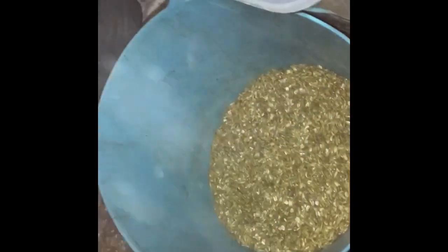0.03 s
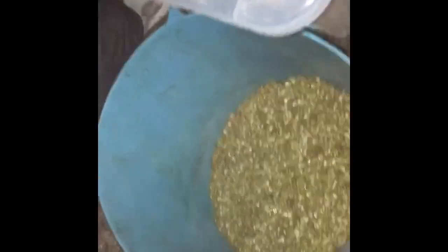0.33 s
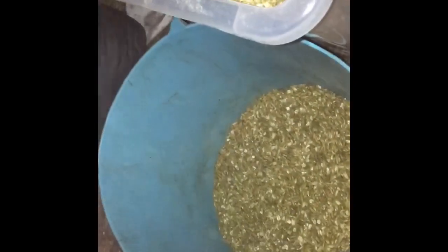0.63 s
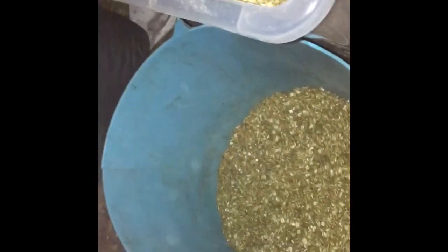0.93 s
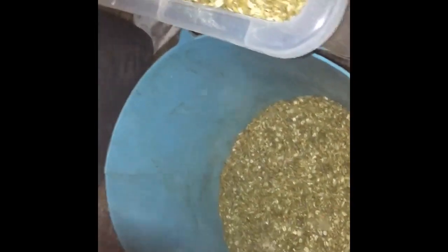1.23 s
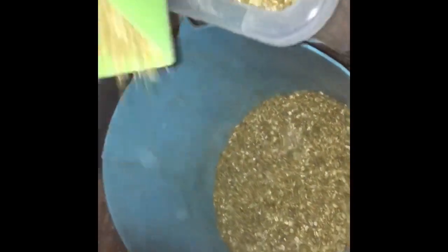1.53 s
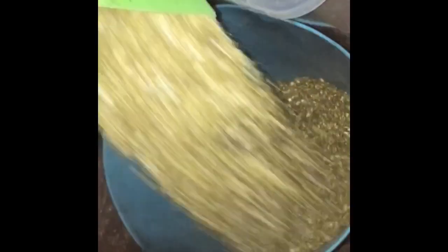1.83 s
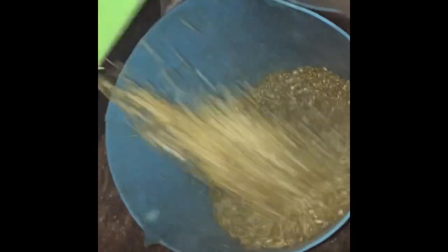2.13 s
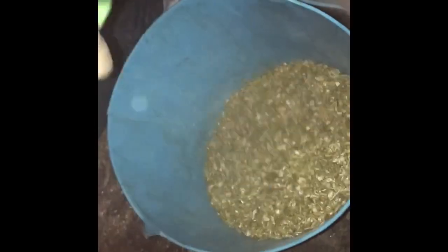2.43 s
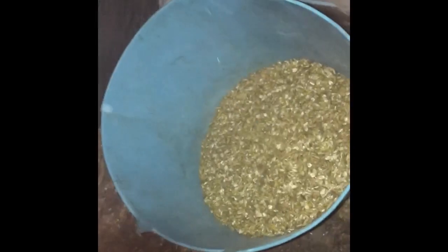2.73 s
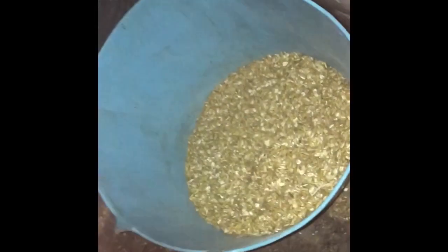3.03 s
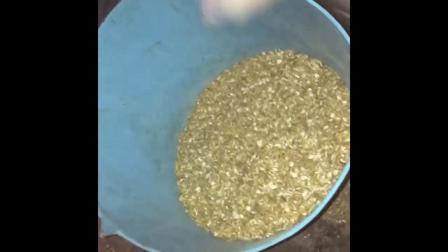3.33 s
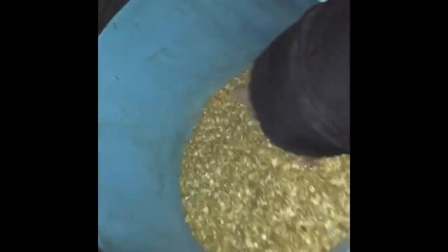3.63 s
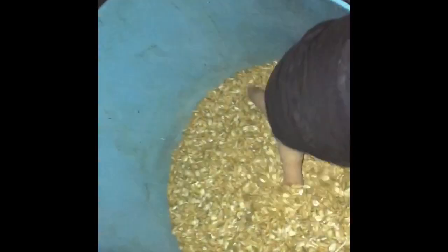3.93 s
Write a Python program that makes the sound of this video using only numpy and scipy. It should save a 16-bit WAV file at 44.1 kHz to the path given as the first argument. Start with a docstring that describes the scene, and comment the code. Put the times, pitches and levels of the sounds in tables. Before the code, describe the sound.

Close up, dry flakes hiss and crunch under a scoop, then rush into a plastic bucket, the scoop knocking as the pour starts and ends. A sleeve swishes past, and hand stirring follows with scraping and dull bumps.

```python
"""Close to one microphone, dry feed is scooped from a tub: countless colliding flakes make
a fine hiss and a coarser crunch. Next the feed is poured into a plastic bucket, and the scoop
knocks as the pour starts and ends. Then comes a quick swish as an arm brushes past.
Last, a hand stirs the feed, scraping along the wall, and the bucket is bumped."""
import sys
import numpy as np
from scipy import signal
from scipy.fft import rfft, irfft, next_fast_len
from scipy.io import wavfile
from scipy.ndimage import map_coordinates

SR = 44100
rng = np.random.default_rng(int(sys.argv[2]) if len(sys.argv) > 2 else 0)


def wav_record(signal):
    """Record a signal, one row per channel, as 16-bit PCM in the file named by sys.argv[1]."""
    frames = np.transpose(np.atleast_2d(signal))
    bounded = np.clip(frames, -1, 1)
    # unit amplitude maps onto the largest positive 16-bit level
    quanta = np.round(bounded * 32767).astype(np.int16)
    wavfile.write(sys.argv[1], SR, quanta)


N = 176400
TIME_S = np.arange(N) / SR
FLAKES_PER_S, CRUNCHES_PER_S, USUAL_FLOW_DB = 11000, 2400, -48  # hits a second at the usual flow
SURGE_DB = 1.13  # the level wavers because the feed slides unevenly


def amp(db):
    """Turn decibels into a number to multiply by."""
    return 10 ** (np.asarray(db) / 20)


def unit(x):
    """Scale a sound to an average (rms) level of 1."""
    return x / np.sqrt(np.mean(x ** 2) + 1e-20)


def curves(rows):
    """Join timed rows with straight lines: one curve for each column after the time."""
    times, *columns = np.transpose(rows)
    return [np.interp(TIME_S, times, column) for column in columns]


def wobble(per_s):
    """A smooth curve through per_s random values a second."""
    values = rng.standard_normal(int(N * per_s / SR) + 4)
    return map_coordinates(values, [TIME_S * per_s])


def filtered(x, gain_at):
    """Turn each frequency up or down by gain_at(hz)."""
    size = next_fast_len(N + 8192)
    return irfft(rfft(x, size) * gain_at(np.fft.rfftfreq(size, 1 / SR)), size)[..., :N]


def coloured(x, colour, tilt_db=0):
    """Give a sound a colour (its mix of low and high) and a tilt per octave, at level 1."""
    points_hz, points_db = np.transpose(colour)

    def gain_at(hz):
        level_db = np.interp(np.log(hz + 1), np.log(points_hz), points_db)
        return amp(level_db + tilt_db * np.log2(hz / points_hz[-1] + 0.0038))
    return unit(filtered(x, gain_at))


def fade(t, fade_s):
    """Die away by 60 dB every fade_s seconds."""
    return np.exp(-np.log(1000) * t / fade_s)


def tone(t, hz, fade_s):
    """A ringing note that starts quickly and dies away."""
    return fade(t, fade_s) * np.sin(2 * np.pi * hz * t) * (1 - np.exp(-t * hz))


def swell(middle_s, length_s):
    """A rounded rise and fall around a moment."""
    return np.exp(-np.abs(2 * (TIME_S - middle_s) / length_s) ** 3 / 2)


def swells(moves, colour):
    """Noise that rises and falls with each movement."""
    loudness = sum(amp(db) * swell(middle_s, length_s) for middle_s, length_s, db in moves)
    return loudness * coloured(rng.standard_normal(N), colour)


def add(track, start_s, sound):
    """Mix a sound into a track at a given time."""
    part = track[round(start_s * SR):][:len(sound)]
    part += sound[:len(part)]


def background():
    """A quiet, low noise whose level wavers a little."""
    # frequency_hz, level_db
    colour = [(20,-20),(55,-2.5),(235,-13),(287,-1.5),(340,-12.5),(1200,-22.5),(15500,-37)]
    level_db = -59 + 1.5 * wobble(per_s=10)
    return amp(level_db) * coloured(rng.standard_normal(N), colour)


def room(sound):
    """The walls send back a short, soft wash of echoes."""
    t = np.arange(SR // 2) / SR
    echoes = rng.standard_normal(len(t)) * fade(t, fade_s=0.22) * (t > .003)
    return amp(-10.5) * signal.fftconvolve(sound, echoes / np.linalg.norm(echoes))[:N]


def bumps():
    """Soft, deep bumps."""
    # middle_s, length_s, level_db
    moves = [(.26,0.074,-55),(.32,0.043,-51),(.45,0.13,-53.5),(.945,.025,-56),(1.265,0.039,-53),(3.81,0.17,-52)]
    # frequency_hz, level_db
    colour = [(25,-21),(55,4),(100,-1),(200,-16),(600,-55)]
    return swells(moves, colour)


def bucket_shifts():
    """The bucket bends and shifts with a dull noise."""
    # middle_s, length_s, level_db
    moves = [(2.945,0.08,-46.5),(3.12,0.21,-54),(3.39,0.1,-45.5),(3.66,0.085,-55),(3.88,0.16,-54)]
    # frequency_hz, level_db
    colour = [(40,-12),(130,-1),(220,3),(370,0),(480,-11),(700,-9),(1500,-32)]
    return swells(moves, colour)


def brush():
    """A swish, likely a sleeve on the rim: its highest part starts at once and dies first."""
    # cloth on plastic: frequency_hz, level_db
    colour = [(150,-9),(320,9),(900,-4),(3000,4),(7000,0),(15500,-3)]
    start_s, rise_s, split_hz = 3.03, 0.021, 8700
    t = TIME_S - start_s
    noise = coloured(rng.standard_normal(N), colour)
    low = filtered(noise, lambda hz: 1 / (1 + (hz / split_hz) ** 4))
    rise = np.clip(t / rise_s, 0, 1)
    after_s = np.maximum(t - rise_s, 0)
    body = low * np.sqrt(rise) * fade(after_s, fade_s=0.14)
    top = (noise - low) * rise ** 0.19 * fade(after_s, fade_s=0.1)
    return amp(-34) * (body + top)


def scrape(stroke, width_hz=340):
    """Rubbing makes a band of noise around a pitch that slides as the stroke goes on."""
    level_db, pitch_hz = curves(stroke)
    slips = filtered(rng.standard_normal((2, N)), lambda hz: 1 / (1 + (hz / width_hz) ** 2))
    phase = 2 * np.pi * np.cumsum(pitch_hz) / SR
    rubbing = unit(slips[0] * np.cos(phase) + slips[1] * np.sin(phase))  # moved up to the pitch
    touching = (TIME_S > stroke[0][0]) & (TIME_S < stroke[-1][0])
    return amp(level_db) * rubbing * touching


def scrapes():
    """The scoop digs into the tub; later the hand slides along the bucket wall."""
    # time_s, level_db, pitch_hz
    scoop_stroke = [(.62,-65,1898),(.68,-47,1724),(.77,-78,1510)]
    # time_s, level_db, pitch_hz
    hand_stroke = [(3.35,-51,890),(3.52,-66,1709),(3.6,-44.5,1640),(3.675,-43,1400),(3.72,-47,1054),(3.75,-59,1061),(3.86,-53.5,1493),(3.92,-62.5,1388),(3.99,-54,1300)]
    return scrape(scoop_stroke) + scrape(hand_stroke)


def snaps():
    """Flakes and plastic snap: each sharp tick has a faint, short tail."""
    # start_s, level_db, brightness_hz
    ticks = [(.8066,-30.5,3000),(.893,-37,2200),(1.257,-49,6000),(1.061,-35.5,9800),(1.238,-49,3600),(1.772,-34,6000),(2.985,-39,6500),(3.002,-43,2500),(3.072,-37,5500),(3.1348,-40,4480),(3.164,-23,3100)]
    out, t = np.zeros(N), np.arange(SR // 4) / SR
    loudness = fade(t, fade_s=0.0065) + amp(-15) * fade(t, fade_s=0.06)
    for start_s, level_db, hz in ticks:
        band = signal.butter(1, [hz * .75, min(hz * 1.35, SR / 2.2)], 'band', fs=SR)
        noise = signal.lfilter(*band, rng.standard_normal(len(t)))
        add(out, start_s, amp(level_db) * unit(noise) * loudness)
    return out


def knocks():
    """Each blow dents one spot of the wall and rings the bucket; soft contacts are duller."""
    # start_s, level_db, brightness_hz, spot_pitch_hz, spot_boost_db, spot_fade_s
    blows = [(1.152,-60,200,146,20.5,0.057),(1.6553,-31,9000,1165,5,.028),(1.6592,-34,550,278,11,.06),(2.2674,-36,1500,410,8,0.044),(2.27,-37,303,147,11.5,.11),(2.279,-31.5,302,270,5.5,0.13),(3.087,-49.5,450,534,11,0.083),(3.354,-46,600,360,18,.045),(3.699,-41,1500,1110,21,0.017),(3.785,-34.5,706,241,12,0.045),(3.794,-36,398,370,13,0.063),(3.806,-43.5,298,287,14.5,0.079),(3.821,-43,250,136,13,.13)]
    # the notes the bucket rings with: pitch_hz, level_db, fade_s
    bucket_notes = [(130,-12,0.16),(148.3,-23,0.77),(150,-9,0.092),(207,-7.5,0.17),(288,-21,0.71),(289,0,0.06),(369,-4.5,0.14),(455,-13.5,0.15),(512,-9,0.08),(834,-10,0.096),(1050,-15,0.05),(1410,-6.5,0.063),(2130,-10,0.051),(2370,1,.032)]
    # the burst of noise in each blow: frequency_hz, level_db
    crack_colour = [(50,-8),(200,8.5),(650,2.5),(1000,1),(2700,-2.5),(4000,-11.5),(9000,-14)]
    out, t = np.zeros(N), np.arange(SR // 2) / SR
    for start_s, level_db, brightness_hz, spot_hz, spot_db, spot_fade_s in blows:
        ring = sum((-1) ** k * amp(db + rng.normal(0, 1)) * tone(t, hz, fade_s)
                   for k, (hz, db, fade_s) in enumerate(bucket_notes))
        noise = coloured(rng.standard_normal(N), crack_colour)[:len(t)]
        crack = amp(8) * fade(t, fade_s=0.042) * noise
        softened = signal.lfilter(*signal.butter(2, brightness_hz, fs=SR), ring + crack)
        dent = amp(spot_db) * tone(t, spot_hz, spot_fade_s)
        add(out, start_s, amp(level_db) * (softened - dent))
    return out


def tiny_hits(per_s, flow_db, spread_db):
    """Random tiny hits of unequal size, more of them as more feed moves."""
    chance = np.clip(per_s / SR * amp(flow_db - USUAL_FLOW_DB), .02, 1)
    sizes = amp(spread_db * np.minimum(rng.standard_normal(N), 2)) * rng.choice([-1, 1], N)
    return sizes * (rng.random(N) < chance) / np.sqrt(chance)  # many or few, equally loud


def patter(level_db=-49):
    """The first falling flakes ring the bare bucket wall until feed covers it."""
    # the wall's hollow notes: pitch_hz, width_hz, level_db
    wall_notes = [(850,140,0),(1240,460,-2)]

    def wall(hz):
        return sum(amp(db) / (1 + (2 * (hz - pitch) / width) ** 2) for pitch, width, db in wall_notes)
    hits = filtered(tiny_hits(CRUNCHES_PER_S, level_db, spread_db=2), wall)
    return amp(level_db) * swell(middle_s=1.86, length_s=0.14) * unit(hits)


def flakes(flow_db, split_hz=6900):
    """Large flakes tick below split_hz and small ones above; each kind surges on its own."""
    large, small = [tiny_hits(FLAKES_PER_S, flow_db, spread_db=4) * amp(SURGE_DB * wobble(per_s=16))
                    for _ in range(2)]
    low = filtered(large, lambda hz: 1 / np.hypot(1, (hz / split_hz) ** 2))
    high = filtered(small, lambda hz: (hz / split_hz) ** 2 / np.hypot(1, (hz / split_hz) ** 2))
    return low + high


def feed(flow, hiss_tilt_db=0, crunch_tilt_db=0):
    """Flakes slide and collide in small clumps: a fine hiss over a coarse crunch."""
    # frequency_hz, level_db
    hiss_colour = [(1000,-30),(3500,-7.5),(5000,-5.5),(6300,0.5),(7700,-3),(9200,0.5),(10500,-4.5),(11800,0.5),(15500,0)]
    # frequency_hz, level_db
    crunch_colour = [(100,-35),(300,2),(580,-4.5),(850,-1),(1600,0.5),(2100,-1.5),(4400,-3.5),(5500,-6),(12000,-24)]
    hiss_db, crunch_db = curves(flow)
    clumps_db = wobble(per_s=110)
    hiss = coloured(flakes(hiss_db), hiss_colour, hiss_tilt_db) * amp(hiss_db + 0.87 * clumps_db)
    crunch = coloured(tiny_hits(CRUNCHES_PER_S, crunch_db, spread_db=2), crunch_colour, crunch_tilt_db)
    crunch *= amp(crunch_db + clumps_db + SURGE_DB * wobble(per_s=24.95))
    moving = (TIME_S >= flow[0][0]) & (TIME_S < flow[-1][0])
    return (hiss + crunch) * moving


def stirring():
    """A hand moves the feed around; buried flakes have a duller hiss."""
    # time_s, hiss_db, crunch_db
    flow = [(2.86,-80,-74),(2.915,-57,-56.5),(2.98,-82,-57),(3.02,-83,-72),(3.08,-59,-59),(3.15,-56.5,-57),(3.25,-63,-61.5),(3.34,-57,-57.5),(3.45,-36,-43),(3.5,-46.5,-50.5),(3.62,-44.5,-42.5),(3.7,-46,-44.5),(3.77,-54,-53.5),(3.85,-51.5,-54.5),(3.92,-54.5,-65),(4,-53,-54)]
    return feed(flow, hiss_tilt_db=-5.5, crunch_tilt_db=0.7)


def scooping():
    """The scoop pushes through the flakes in the tub."""
    # time_s, hiss_db, crunch_db
    flow = [(0,-54,-56),(.1,-42.5,-53),(.16,-45.5,-55.5),(.3,-49,-55),(.43,-45,-53),(.52,-44.5,-57.5),(.65,-49,-55),(.715,-43,-46),(.765,-44.5,-47),(.805,-37,-40.5),(.84,-49,-48.5),(.96,-47,-48),(1.07,-52,-51),(1.12,-58.5,-63.5),(1.2,-69,-65)]
    return feed(flow)


def pouring():
    """Feed streams off the scoop and lands in the bucket."""
    # time_s, hiss_db, crunch_db
    flow = [(1.2,-72,-72.5),(1.33,-66,-68),(1.51,-46.5,-49),(1.65,-42.5,-47),(1.72,-48,-47.5),(1.78,-44,-44),(1.82,-32,-43),(1.91,-33,-41),(2.06,-33,-47),(2.21,-34,-54),(2.3,-41,-53.5),(2.48,-47,-63.5),(2.58,-59.5,-72.5),(2.85,-73,-73)]
    return feed(flow) + patter()


def scene():
    """Scooping, pouring and stirring over a quiet background, the same in both ears."""
    rustle = scooping() + pouring() + stirring()
    close = rustle + knocks() + snaps() + brush() + scrapes()
    low = bucket_shifts() + bumps() + background()
    return np.tile(close + room(close) + low, (2, 1))


def record(dry, top_hz=15830):
    """Remove everything higher than top_hz."""
    return filtered(dry, lambda hz: hz < top_hz)


dry = scene()
out = record(dry)
wav_record(out)
```